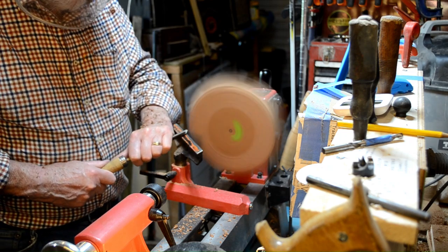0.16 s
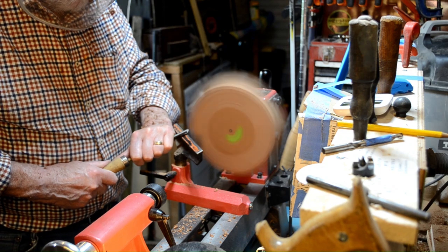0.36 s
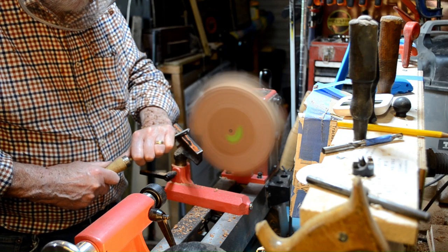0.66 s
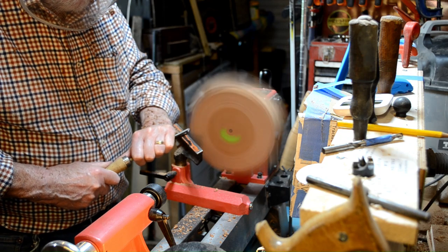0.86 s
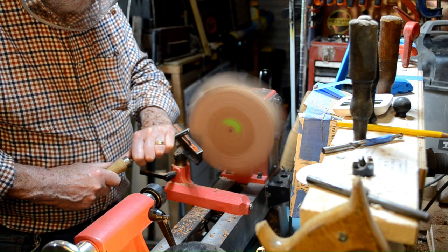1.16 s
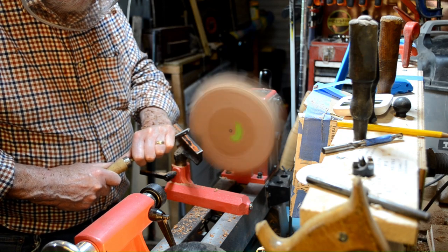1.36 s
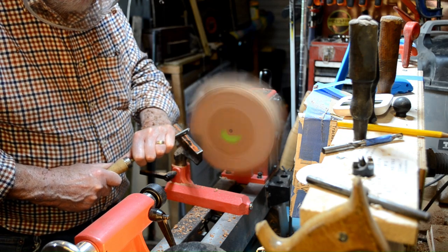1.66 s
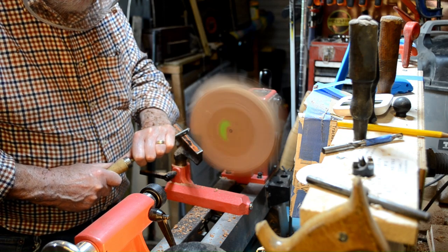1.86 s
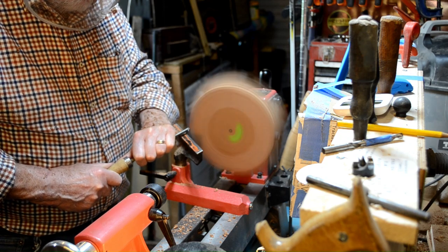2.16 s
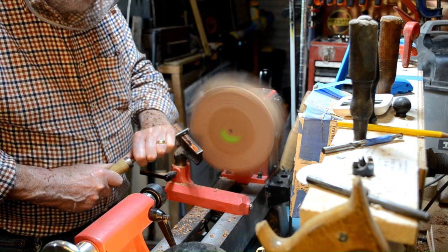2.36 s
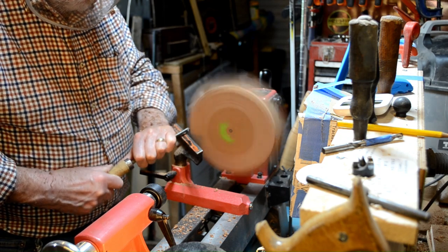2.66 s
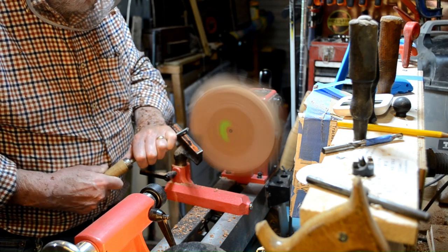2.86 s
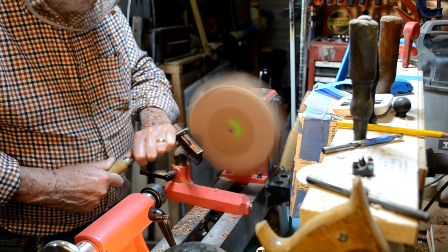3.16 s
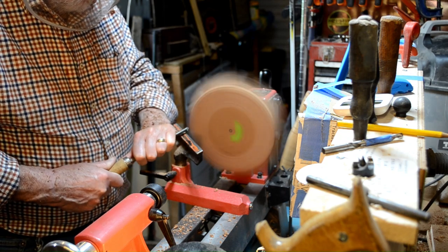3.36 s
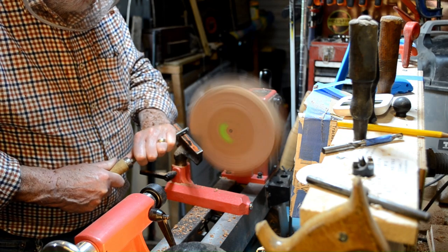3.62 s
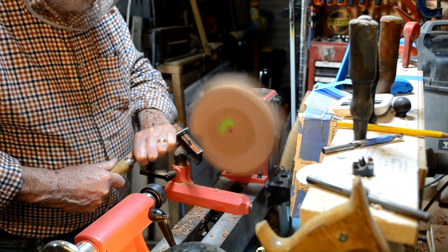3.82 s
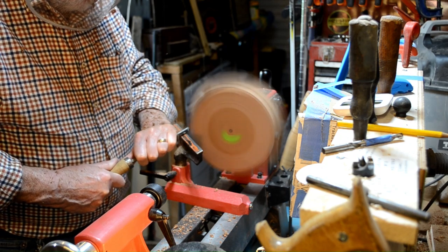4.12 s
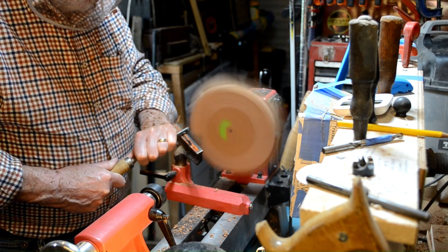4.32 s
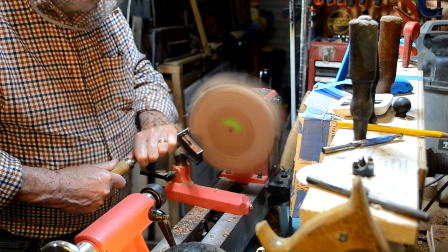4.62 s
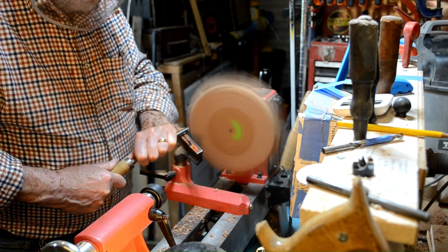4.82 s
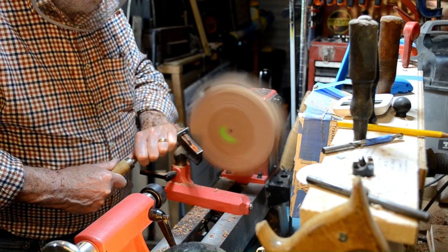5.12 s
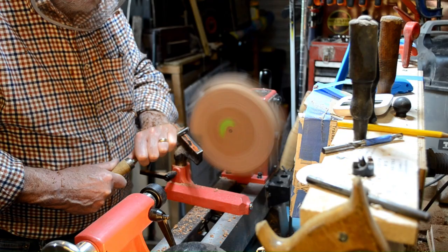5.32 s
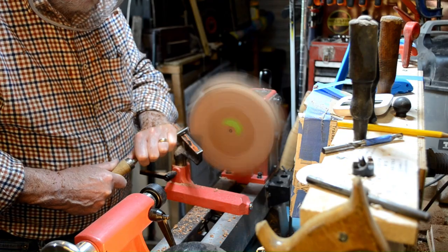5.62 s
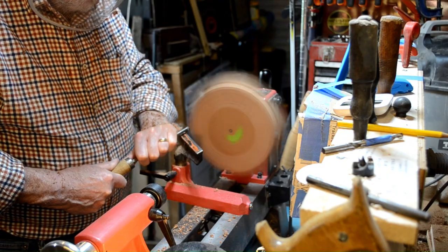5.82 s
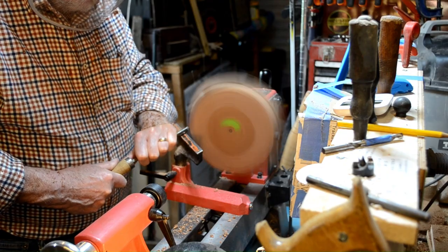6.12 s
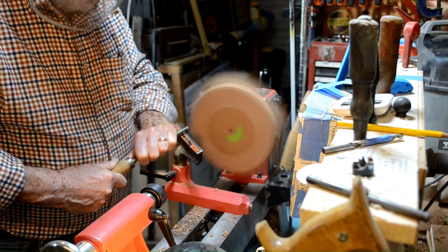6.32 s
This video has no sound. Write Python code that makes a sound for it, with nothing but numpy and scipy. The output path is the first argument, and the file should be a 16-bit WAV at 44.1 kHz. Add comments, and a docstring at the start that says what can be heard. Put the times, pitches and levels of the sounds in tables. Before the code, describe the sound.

A wood lathe runs with a steady motor whine and a soft fan rush. A hand-held gouge meets the uneven spinning wood, making a rapid run of hollow knocks, rough scrapes and slight metallic ringing. The cutting pauses briefly, then returns harder, with occasional catches and judders. The whine sags a little under each cut, and the stand rumbles. It sounds close, in a small workshop.

```python
"""A hand-held gouge roughs an out-of-round blank on a wood lathe in a small workshop.
The blank turns about 8.6 times a second and its four corners strike the gouge in turn.
Each strike, as hard as the gouge is fed, thuds the wood, rings the tool rest and tears fibres;
at times the edge catches or digs in and judders. Behind it the motor whines and sags under load,
its fan rushes, and the stand shakes while the cut lasts."""
import sys
import numpy as np
from scipy import signal
from scipy.fft import rfft, irfft
from scipy.io import wavfile

SR = 44100
rng = np.random.default_rng(int(sys.argv[2]) if len(sys.argv) > 2 else 0)


def int16_out(signal):
    """Quantize to a 16-bit WAV file."""
    q = np.round(np.clip(np.atleast_2d(signal).T, -1, 1) * 32767)
    wavfile.write(sys.argv[1], SR, q.astype(np.int16))


N = 285723


def amp(db):
    return 10 ** (np.asarray(db) / 20)


def unit(x):
    """Scale to rms 1."""
    return x / np.sqrt(np.mean(x ** 2) + 1e-20)


def curve(rows):
    """Breakpoints in time, interpolated per sample."""
    return np.interp(np.arange(N) / SR, *np.transpose(rows))


def at(rows, t_s):
    """Each column's value at one time."""
    times, *columns = np.transpose(rows)
    return np.array([np.interp(t_s, times, column) for column in columns])


def log_interp(points, hz):
    """Breakpoints joined on a log-frequency axis."""
    f, value = np.transpose(points)
    return np.interp(np.log(hz + 1), np.log(f), value)


def add(mix, t_s, sound):
    part = mix[max(round(t_s * SR), 0):][:len(sound)]
    part += sound[:len(part)]


def wander(hz, size):
    """Smooth random drift up to about hz, rms 1."""
    f = np.fft.rfftfreq(size, 1 / SR)
    return unit(irfft(rfft(rng.standard_normal(size)) * np.exp(-(f / hz) ** 2), size))


def lowpass_gain(hz, edge_hz, order=6):
    return 1 / np.sqrt(1 + (hz / edge_hz) ** (2 * order))


def body_gain(colour, modes, hz):
    """Smooth colour with resonance peaks on top."""
    peaks = sum(amp(db) ** 2 / (1 + (2 * (hz - f) / width) ** 2) for f, width, db in modes)
    return amp(log_interp(colour, hz)) * np.sqrt(1 + peaks)


def body_noise(colour, modes):
    """Steady noise through a body, rms 1."""
    hz = np.fft.rfftfreq(N, 1 / SR)
    return unit(irfft(rfft(rng.standard_normal(N)) * body_gain(colour, modes, hz), N))


def causal(gain):
    """Minimum-phase response, peak gain 1: rings only after the strike."""
    log_gain = np.log(np.maximum(gain / gain.max(), 1e-5))
    mirrored = np.r_[log_gain, log_gain[-2:0:-1]]
    return np.exp(np.conj(signal.hilbert(mirrored)))[:len(gain)]


def struck(force, response):
    """A body's answer to a force, with the energy of 20 ms at rms 1."""
    size = 2 * (len(response) - 1)
    return np.sqrt(.02 * SR / size) * unit(irfft(rfft(force, size) * response))


def resonate(x, hz, width_hz):
    """Unity-gain resonance tracking the curve hz."""
    phasor = np.exp(2j * np.pi * np.cumsum(hz) / SR)
    pole = np.exp(-np.pi * width_hz / SR)
    return 2 * (phasor * signal.lfilter([1 - pole], [1, -pole], x / phasor)).real


# room decay: f/Hz, T60/s
ROOM_DECAY = [(200, 0.42), (1000, 0.19), (3000, 0.068), (7500, 0.084), (14000, 0.017)]


def workshop(x, predelay_s=0.0048, reflections_per_s=4000):
    """Dense reflections of a small room; the treble dies first."""
    taps = rng.standard_normal(SR // 2) * (rng.random(SR // 2) < reflections_per_s / SR)
    hz, t, spectra = signal.stft(taps, SR, nperseg=256)
    decay = amp(-60 * t / log_interp(ROOM_DECAY, hz)[:, None])
    tail = signal.istft(spectra * decay, SR, nperseg=256)[1]
    tail = np.r_[np.zeros(int(predelay_s * SR)), tail]
    return signal.fftconvolve(x, tail / np.linalg.norm(tail))[:N]


# rumble and drone envelopes: t/s, level/dB
RUMBLE_LEVEL = [(0, -82), (.7, -59), (1.1, -47.5), (1.6, -44), (2.6, -40.5), (2.92, -54), (3.06, -40),
                (3.4, -64), (3.7, -45.5), (4.7, -34.5), (4.95, -44.5), (5.5, -39.5), (6.48, -38)]
DRONE_LEVEL = [(0, -65), (1, -87), (1.7, -53), (2.4, -62), (3.1, -74), (4, -62), (4.4, -41), (4.75, -74.5),
               (5.1, -61), (5.6, -56), (6, -40.5), (6.48, -31.5)]
# stand spectrum: f/Hz, gain/dB
STAND_COLOUR = [(18, -28), (32, 5.5), (44, -20), (70, 6), (105, 0), (130, -19), (260, -54)]
# stand resonances: f/Hz, width/Hz, gain/dB
STAND_MODES = [(32.5, 4, 5.5), (81, 33, 4.7)]


def stand(drone_hz=99.7, drift=0.016):
    """The shaken stand rumbles; a low drone swells in the long cuts."""
    pitch_hz = drone_hz * (1 + drift * wander(6.7, N))
    drone = np.sqrt(2) * np.sin(2 * np.pi * np.cumsum(pitch_hz) / SR)
    rumble = body_noise(STAND_COLOUR, STAND_MODES)
    return amp(curve(RUMBLE_LEVEL)) * rumble + amp(curve(DRONE_LEVEL)) * drone


# fan and bearing spectrum: f/Hz, gain/dB
FAN_COLOUR = [(20, -4), (55, 10), (95, 8), (130, 3.5), (210, 6), (280, 14.5), (420, 3), (1200, 1),
              (2200, 2), (3500, -5), (5000, -2.5), (6200, -2), (7500, 0.5), (8600, -13), (10000, -14),
              (15000, -27)]
# housing resonances: f/Hz, width/Hz, gain/dB
HOUSING_MODES = [(971, 51, 12.4), (1316, 33, 17), (4660, 98, 16), (5350, 57, 4)]


def fan(level_db=-47.5):
    """Fan and bearings rush through the motor housing."""
    return amp(level_db) * body_noise(FAN_COLOUR, HOUSING_MODES)


# motor speed as whine pitch, sagging under the cut, overshooting on release: t/s, f/Hz
WHINE_PITCH = [(0.0, 662.6), (0.7, 662.6), (0.85, 682.4), (1.1, 658.6), (1.4, 644.2), (1.75, 656.1),
               (2.1, 650.5), (2.55, 655.4), (2.66, 681.3), (2.73, 684.4), (2.98, 669.8), (3.06, 651.3),
               (3.18, 665.6), (3.5, 669.1), (3.68, 637.1), (3.8, 678.1), (4.0, 622.0), (4.3, 649.5),
               (4.7, 648.1), (4.88, 684.1), (5.2, 680.8), (5.5, 649.0), (5.85, 626.5), (6.48, 628.6)]
# partials: multiple of pitch, base level/dB
WHINE_PARTIALS = [(1, -62), (1.5, -56), (2, -58.5), (3, -61), (4, -63.5), (5, -80), (6, -61.5),
                  (6.94, -65.5), (7, -56.5), (8, -60), (9, -68), (10, -59.5), (11, -75.5), (12, -77),
                  (13, -84), (14, -78), (15, -82), (16, -87)]
# lift of the upper partials: t/s, gain/dB
WHINE_SWELL = [(0, 3), (.7, 6.5), (2.6, 7), (2.75, 8.5), (3.0, 2.5), (3.2, 5), (3.5, 4.5), (4.85, 1)]
WHINE_CYCLES_PER_TURN = 74.654


def motor(flutter=0.00023, waver_db=.8, throb_db=6, swell_above_multiple=6.5):
    """Whine locked to shaft speed; the unbalanced blank makes partial 2 throb once a turn."""
    cycles = np.cumsum(curve(WHINE_PITCH) * (1 + flutter * wander(33, N))) / SR
    turns = cycles / WHINE_CYCLES_PER_TURN
    whine = np.zeros(N)
    for multiple, base_db in WHINE_PARTIALS:
        level_db = base_db + waver_db * wander(25, N)
        if multiple == 2:
            level_db += throb_db * np.cos(2 * np.pi * (turns - 0.25))
        if multiple > swell_above_multiple:
            level_db += curve(WHINE_SWELL)
        whine += amp(level_db) * np.sin(2 * np.pi * (multiple * cycles + rng.random()))
    return np.sqrt(2) * whine


def bite(rise_s, size, chatter_hz=1000, snaps_per_s=3500, snap_spread_db=3, drag_s=0.02):
    """Force of one strike: fibres snap and the edge chatters as pressure swells and falls."""
    t = np.arange(size) / SR
    u = t / rise_s
    pressure = np.sqrt(u) * np.tanh(2 * u) * np.exp((1 - u * u) / 4)
    pressure += .13 * t / drag_s * np.exp(1 - t / drag_s)  # bevel drags behind the corner
    snap_sizes = amp(snap_spread_db * np.minimum(rng.exponential(1, size), 4))
    snaps = snap_sizes * rng.choice([-1, 1], size) * (rng.random(size) < snaps_per_s / SR)
    # stick-slip speeds up with pressure
    slip_hz = chatter_hz * rng.uniform(0.55, 1.4) * (1 + .4 * (pressure - 1))
    slip_hz *= 1 + .07 * wander(600, size)
    slips = np.diff(np.floor(np.cumsum(slip_hz) / SR), prepend=0)
    tearing = .57 * unit(snaps) + .37 * unit(slips - slips.mean()) + .5 * rng.standard_normal(size)
    grain_db = 1.5 * wander(153, size)
    return pressure * amp(grain_db) * tearing


# digs: t/s, rise/s, level/dB
DIGS = [(2.996, 0.013, -18.5), (4.125, 0.015, -21.5), (4.603, 0.012, -22), (5.745, 0.017, -23),
        (6.161, 0.00707, -18), (6.343, 0.0066, -25)]
# judder spectrum: f/Hz, gain/dB
JUDDER_COLOUR = [(80, -48), (135, 6), (220, -13), (268, 14.5), (340, -8), (520, 2), (640, -0.5),
                 (850, -6.5), (1400, -22), (1950, -19), (3000, -48), (6000, -54)]


def judders(bounce_hz=560, size=8192):
    """In a dig the gouge hammers on its rest, slower and duller than in a clean cut."""
    response = causal(amp(log_interp(JUDDER_COLOUR, np.fft.rfftfreq(size, 1 / SR))))
    out = np.zeros(N)
    for t_s, rise_s, level_db in DIGS:
        force = bite(rise_s, size, chatter_hz=bounce_hz)
        add(out, t_s, amp(level_db) * struck(force, response))
    return out


def chip(force, low_hz=1900, high_hz=4600, glide=0.095, squeak_gain=2.18):
    """Each chip squeaks at its own pitch, sliding as it curls off the edge."""
    hz = low_hz * (high_hz / low_hz) ** rng.random() * np.exp(glide * wander(35, len(force)))
    return force + squeak_gain * resonate(force, hz, width_hz=200)


def splinter(force, low_hz=8500, high_hz=15000, tick_gain=3.4, decay_s=0.0062):
    """A thin splinter snaps off with a high tick as the edge enters."""
    hz = np.full(len(force), rng.uniform(low_hz, high_hz))
    onset = force * np.exp(-np.arange(len(force)) / SR / decay_s)
    return force + tick_gain * resonate(onset, hz, width_hz=700)


def swing(size, note_hz=267, rise_s=.008, decay_s=0.0212, detune=0.0401):
    """A push swings the whole blank on its spindle: one hollow note."""
    t = np.arange(size) / SR
    hz = note_hz * (1 + detune * rng.standard_normal())
    return (1 - np.exp(-t / rise_s)) * np.exp(-t / decay_s) * np.sin(2 * np.pi * hz * t)


def in_phase(mix, t_s, thud):
    """The edge bites as the blank swings onto it, so a thud feeds the ring already there."""
    ringing = mix[max(round(t_s * SR), 0):][:len(thud)]
    analytic = signal.hilbert(thud)
    offset_rad = np.angle(ringing @ analytic[:len(ringing)])
    return (analytic * np.exp(-1j * offset_rad)).real


# feed pressure, gouge on to gouge off: t/s, level/dB
FIRST_FEED = [(0.69, -7.5), (0.82, -4), (1.0, 1.4), (1.4, 7), (1.8, 0.3), (1.92, 0.5), (2.24, -0.8),
              (2.42, 6), (2.59, 4)]
SECOND_FEED = [(3.28, -19.5), (3.44, -27), (3.52, -3), (3.629, -22), (3.74, -16.5), (3.86, 6), (4.102, 4),
               (4.57, 4.5), (4.66, -35)]
THIRD_FEED = [(4.719, 1), (4.872, -15.5), (4.968, -4.2), (5.3, -5), (5.52, 12.5), (5.59, -5.5), (5.7, 11.5),
              (6.1, 9.5), (6.48, 11.5)]
# where each corner meets the gouge: angle/turns
CORNER_ANGLES = [.168, .39, .668, .892]
# how proud each corner stands: t/s, gain/dB for corners 1-4
CORNER_PROUD = [(0.7, -8.5, -5.8, 4.5, -3), (1.4, -2.5, -3, -3, -3), (2.0, 7, 6.5, 1.5, 2.5),
                (2.5, -4, 3.4, 0, -5.5), (3.6, 6.4, 8, -2.5, 3.7), (4.4, 1.5, 2.5, -0.6, -3.5),
                (5.1, -4, 6.5, 2, 4), (5.8, -4.5, -7, -5.5, -2.7), (6.45, -2.4, 2.7, -1, -3)]
# bite per corner, relative levels: rise/s, wood thud/dB, rest ring/dB, fibre rasp/dB, rasp treble/dB
CORNER_BITES = [(0.0069, -26.5, -29.5, -22, -9.5), (.007, -26, -26, -24.5, -13),
                (.006, -28, -30.5, -24, -11), (.007, -25, -23.5, -25, -12)]
# a corner catches the edge: t/s, then as CORNER_BITES
CATCHES = [(.72, .009, -28, -23, -21.5, -12.5), (.971, 0.013, -19.5, -19.5, -14, -10.5),
           (1.887, 0.0062, -19.5, -20.5, -17, -10), (2.003, 0.0064, -18.5, -19, -16.5, -8.5),
           (2.059, 0.01, -20, -29.5, -15, -7), (2.306, 0.009, -21, -14, -16, -17),
           (2.423, 0.0075, -17, -12.5, -17, -11.5), (2.972, 0.0042, -32, -30.5, -31, -14),
           (2.992, 0.0034, -14, -15, -16.5, -15), (3.504, 0.0038, -32.5, -28, -25, -14.5),
           (3.606, 0.0075, -20.5, -20, -19.5, -18), (3.639, 0.005, -21.5, -19.5, -14.5, -11),
           (3.945, 0.0051, -19.5, -13, -19, -12), (4.066, 0.008, -17, -16, -21, -14),
           (4.183, 0.0069, -17.5, -16.5, -20.5, -14), (4.443, 0.0064, -13.5, -20, -13.5, -9.5),
           (4.592, .0038, -13.5, -16, -17, -18), (4.678, 0.011, -18.5, -17.5, -11.5, -5.5),
           (4.794, .0066, -43, -23, -24, -10), (4.974, 0.0043, -25, -18, -21.5, -16),
           (5.136, .0066, -16, -23.5, -20, -16), (5.194, .0097, -17, -19.5, -16, -18.5),
           (5.308, 0.0059, -20, -21.5, -17, -18), (5.736, .0062, -12.5, -18.5, -12.5, -13.5),
           (5.89, 0.0065, -14.5, -17.5, -21.5, -14), (6.002, 0.0088, -13, -13.5, -18.5, -13),
           (6.277, .0049, -17.5, -12.5, -11.5, -16.5), (6.338, 0.0065, -18, -23.5, -14, -14.5)]


def strikes(grain_db=0.93, same_corner_s=.016, recoil_above_db=-17.5, recoil_slope=1.9):
    """All catches, plus a bite per passing corner, as hard as it is fed and stands proud."""
    turns = np.cumsum(curve(WHINE_PITCH)) / SR / WHINE_CYCLES_PER_TURN
    rows, recoil_db = list(CATCHES), 0
    for turn in range(int(turns[-1]) + 1):
        for corner, (rise_s, *levels_db, treble_db) in enumerate(CORNER_BITES):
            t_s = np.searchsorted(turns, turn + CORNER_ANGLES[corner]) / SR
            scatter_db = grain_db * rng.standard_normal(3)
            for feed in (FIRST_FEED, SECOND_FEED, THIRD_FEED):
                if not feed[0][0] <= t_s < min(feed[-1][0], N / SR):
                    continue
                # a nearby catch stands in for the regular bite
                row = next((catch for catch in CATCHES if abs(catch[0] - t_s) < same_corner_s), None)
                if row is None:
                    depth_db = at(feed, t_s)[0] + at(CORNER_PROUD, t_s)[corner] - recoil_db
                    row = (t_s, rise_s, *(np.array(levels_db) + depth_db + scatter_db), treble_db)
                    rows.append(row)
                # a hard bite throws the gouge back, weakening the next
                *_, rasp_db, _ = row
                recoil_db = recoil_slope * max(rasp_db - recoil_above_db, 0)
    return sorted(rows)


# cut spectrum between resonances: f/Hz, gain/dB
CUT_COLOUR = [(100, -41), (158, -0.5), (205, -7.5), (226, -9), (246, -0.5), (300, 0.5), (340, 2), (580, -1),
              (850, -8), (1400, -5), (2300, -2.5), (3100, 1), (4400, 0), (6500, 0.5), (8500, -10.5),
              (12000, -14), (13000, -23.5), (15500, -25)]
# resonances of blank, tool rest and gouge: f/Hz, width/Hz, gain/dB
CUT_MODES = [(149.8, 12.3, 10), (249.5, 15, 20.5), (265.67, 13.86, 23.5), (288.8, 14, 19.5),
             (468.5, 13.6, 14), (541, 28.5, 11.5), (721.7, 7.6, 16.5), (1064, 270, 3.5), (1266, 14, 14.5),
             (1333, 59, 8.5), (1371, 46, 16), (1633, 36, 9.5), (1894, 56, 8), (2070, 134, 6),
             (2292, 61, 11.5), (2776, 220, 7), (3590, 56, 6.5), (4057, 163, 11), (4500, 130, 7.5),
             (4880, 95, 8.5), (5800, 63, 4.5), (6170, 92, 3), (8390, 120, 7)]


def cutting(thud_trim_db=-1.5, treble_lift_db=9, wood_hz=820, rest_hz=1800, treble_hz=5200, size=16384):
    """Each strike drives wood (lows), tool rest (mids) and tearing fibres (highs)."""
    hz = np.fft.rfftfreq(size, 1 / SR)
    body = body_gain(CUT_COLOUR, CUT_MODES, hz)
    below_wood, below_rest = lowpass_gain(hz, wood_hz), lowpass_gain(hz, rest_hz)
    wood = causal(body * below_wood)
    rest = causal(body * below_rest * np.sqrt(1 - below_wood ** 2))
    fibres = causal(body * np.sqrt(1 - below_rest ** 2))
    shelf = 1 - lowpass_gain(hz, treble_hz, order=4) ** 2
    thuds, scrapes = np.zeros(N), np.zeros(N)
    for t_s, rise_s, thud_db, ring_db, rasp_db, treble_db in strikes():
        force = unit(bite(rise_s, size // 4))
        thud = struck(force, wood)[:size // 2]
        add(thuds, t_s, amp(thud_db + thud_trim_db) * in_phase(thuds, t_s, thud))
        add(thuds, t_s, amp(thud_db) * in_phase(thuds, t_s, swing(size // 2)))
        add(scrapes, t_s, amp(ring_db) * struck(force, rest))
        torn = struck(splinter(chip(force)), fibres)
        rasp = irfft(rfft(torn) * amp((treble_db + treble_lift_db) * shelf))[:size // 2]
        add(scrapes, t_s, amp(rasp_db) * rasp)
    return thuds, scrapes


def scene(scrape_db=-5.5, scrape_send_db=-8.5, thud_send_db=-13):
    """The cut and its room reflections over motor, fan and stand; mono."""
    thuds, scrapes = cutting()
    scrapes = amp(scrape_db) * scrapes + judders()
    room = workshop(amp(scrape_send_db) * scrapes + amp(thud_send_db) * thuds)
    return (thuds + scrapes + room + motor() + fan() + stand())[None]


def record(dry):
    """Soft-clip the highest peaks, then low-pass."""
    rounded = dry / (1 + dry ** 6) ** (1 / 6)
    lowpass = signal.firwin(511, cutoff=15800, window=("kaiser", 9), fs=SR)
    return signal.oaconvolve(rounded, lowpass[None], "same")


dry = scene()
out = record(dry)
int16_out(out)
```